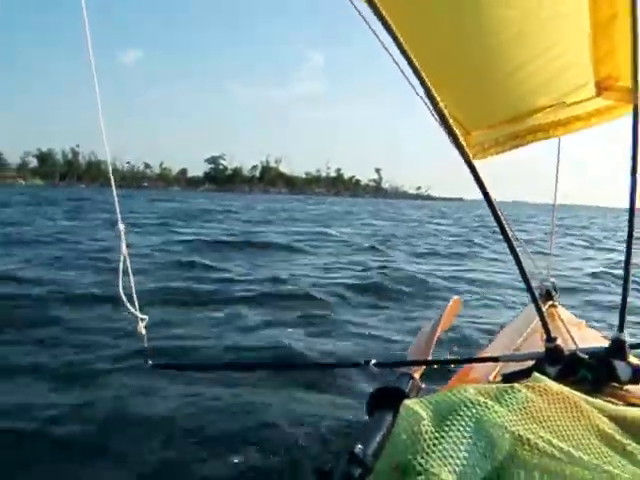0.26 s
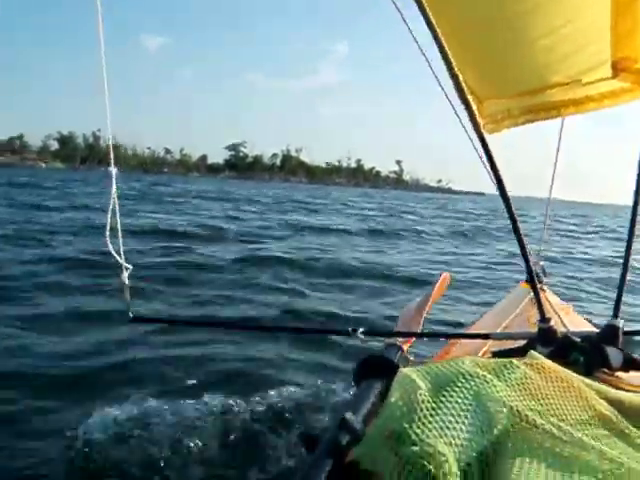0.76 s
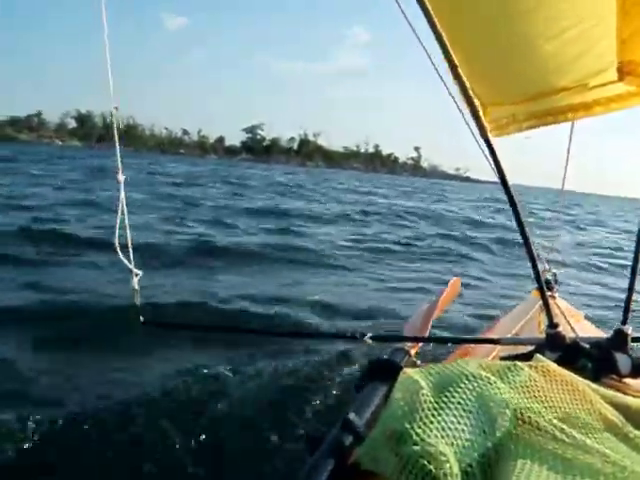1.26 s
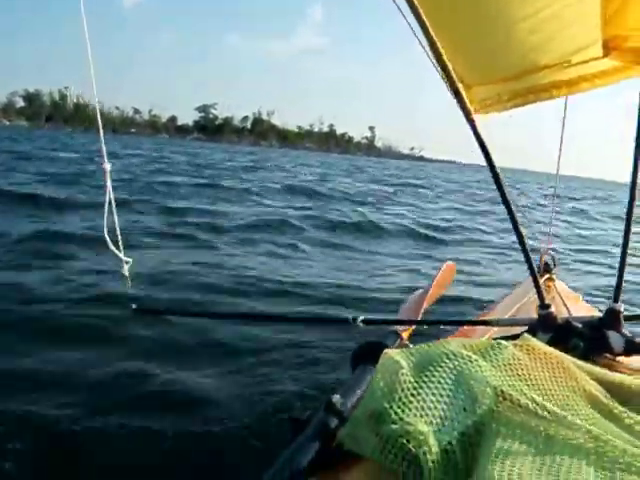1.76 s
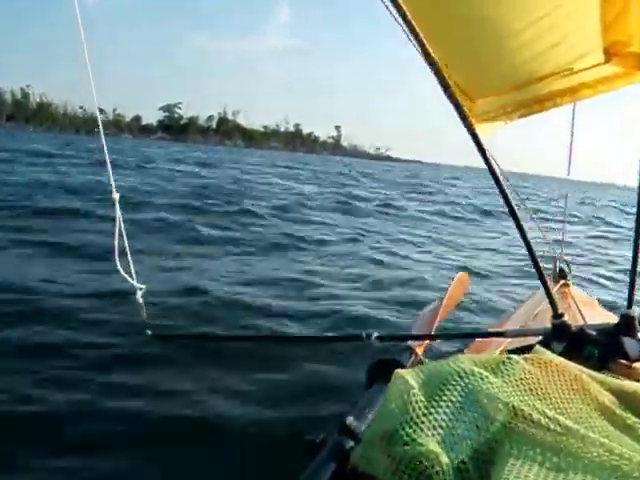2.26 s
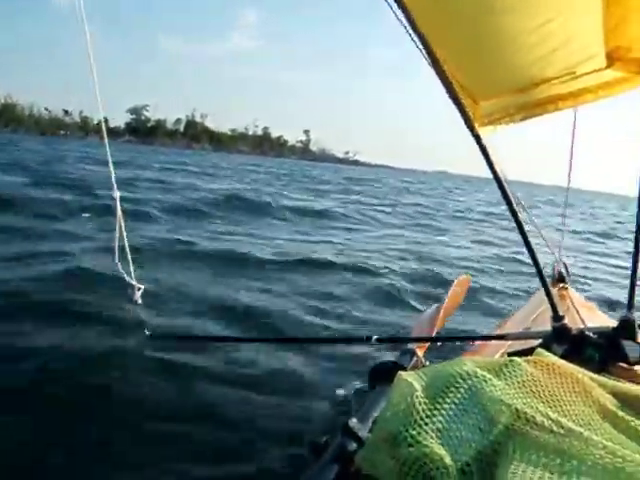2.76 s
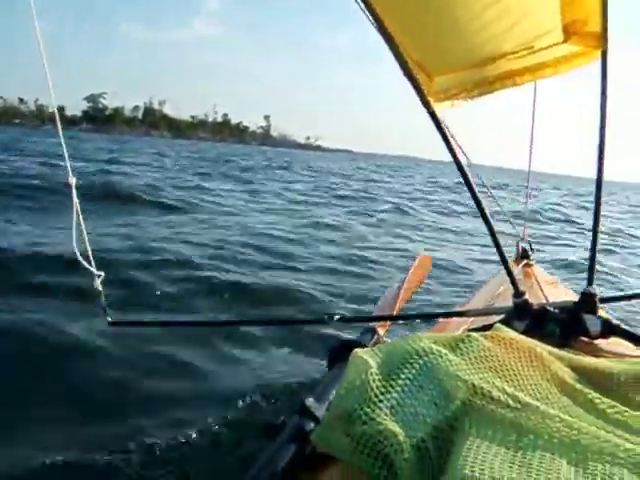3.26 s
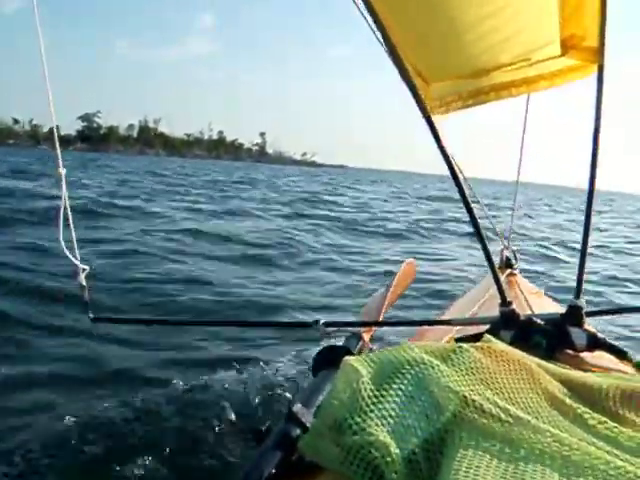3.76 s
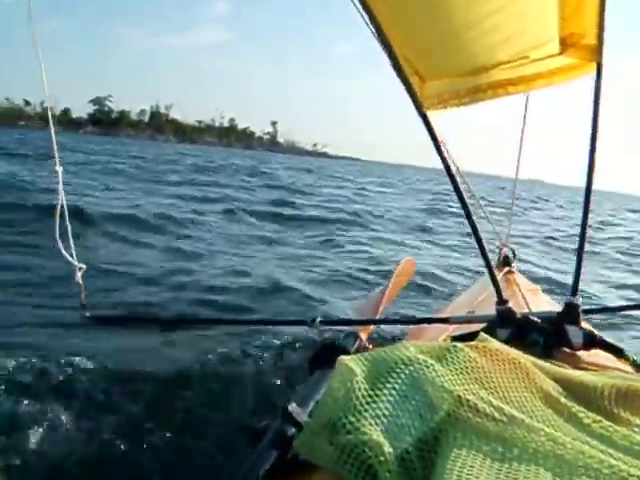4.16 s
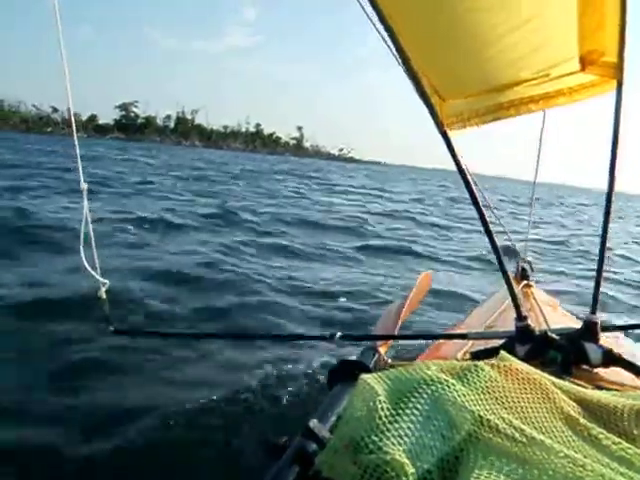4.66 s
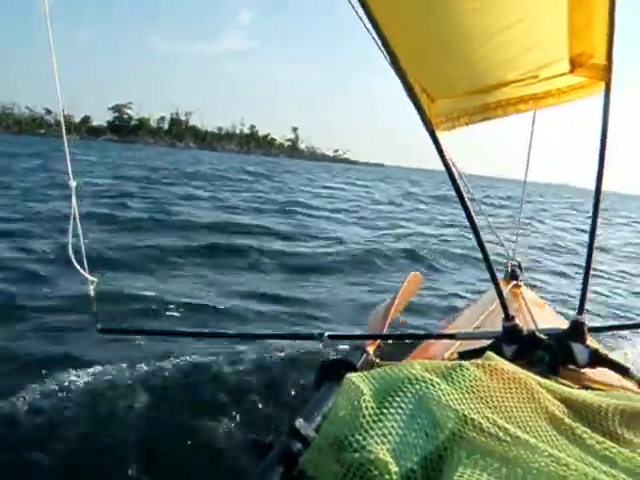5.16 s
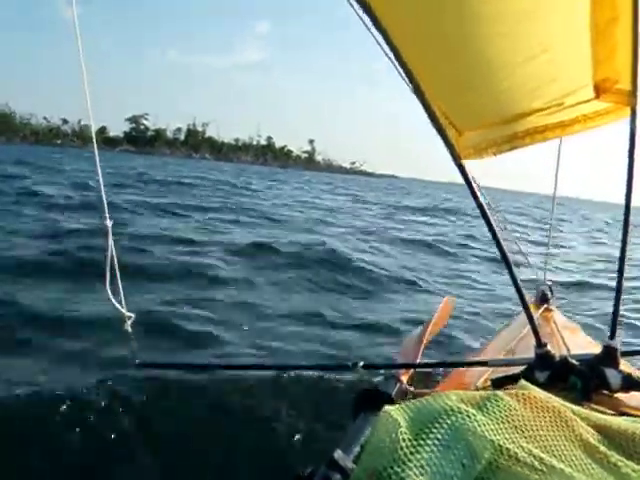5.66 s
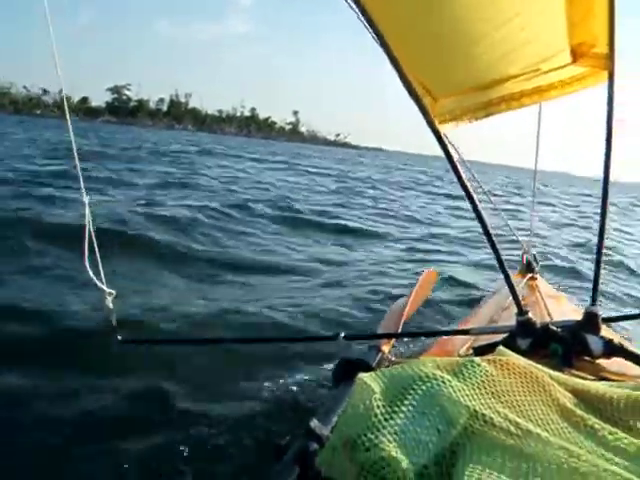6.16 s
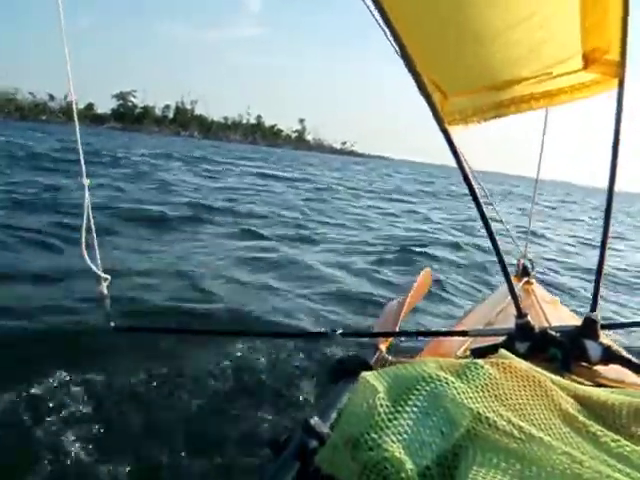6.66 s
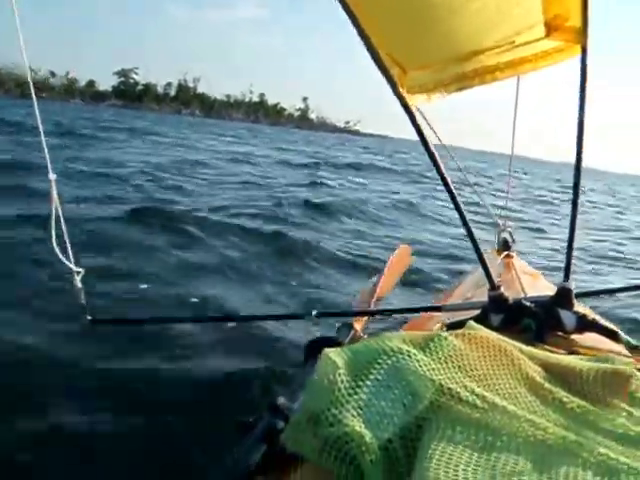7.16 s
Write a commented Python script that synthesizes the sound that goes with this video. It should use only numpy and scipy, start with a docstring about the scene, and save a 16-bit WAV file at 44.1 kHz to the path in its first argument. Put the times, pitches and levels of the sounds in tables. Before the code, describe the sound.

Choppy water churns and swells along a small boat's hull, with hollow slaps, bubbling gurgles, ticking drops and low wind thumps on the microphone.

```python
"""Bow waves of a small sailing kayak in chop, heard from a camera on board.
Each wave swells into churning bubbles and spray: patchy coloured noise plus swarms of decaying sines.
Wavelets slap the hull, air pockets gurgle upward in pitch, drops tick and ping, flung spray patters.
Wind is flickering low noise; buffets are short runs of low-pitched pressure pulses.
The camera adds two faint steady tones and a low-pass."""
import sys
import numpy as np
from scipy import signal
from scipy.fft import rfft, irfft, next_fast_len
from scipy.io import wavfile
from scipy.ndimage import uniform_filter1d

SR = 44100
rng = np.random.default_rng(int(sys.argv[2]) if len(sys.argv) > 2 else 0)


def int16_out(signal):
    """Quantize to a 16-bit WAV file."""
    q = np.round(np.clip(np.atleast_2d(signal).T, -1, 1) * 32767)
    wavfile.write(sys.argv[1], SR, q.astype(np.int16))


N = 325898
T = np.arange(N) / SR

# Levels in the tables are nominal, before each source's trim gains.
# waves breaking at the bow: crest_s, rise_s, fall_s, churn_db, spray_db
BOW_WAVES = [(0.1, 0.18, 0.1, -41, -54), (0.8, 0.3, 0.29, -32, -44.5), (1.3, 0.086, 0.085, -33.5, -43.5),
             (1.63, 0.15, .17, -44, -50.5), (2.97, .22, 0.26, -39, -56), (3.9, 0.34, 0.22, -32.5, -45),
             (4.55, 0.22, 0.34, -42, -52), (5.02, 0.11, .17, -33.5, -46), (5.37, .12, 0.25, -39.5, -52),
             (6.4, 0.21, 0.34, -32.5, -45.3), (7.38, 0.14, .15, -36.5, -49)]
# spectrum of churning water: freq_hz, density_db (relative)
CHURN_SPECTRUM = [(140, -16.5), (290, 4.5), (440, 4), (610, 5), (960, 3.5), (1240, -1.5), (1680, -2.5),
                  (2150, -16.5), (2850, -42), (5100, -58.5)]
# spectrum of spray: freq_hz, density_db (relative)
SPRAY_SPECTRUM = [(1250, 0), (2050, 2.5), (2550, 0.5), (3150, 1), (3850, -1.5), (4850, -1.5), (6050, -3.5),
                  (7050, -6.5), (8050, -11.5), (8900, -38)]
# wind level at the microphone: time_s, level_db
WIND_LEVEL = [(0.0, -37), (0.12, -45), (0.33, -43), (0.54, -34), (0.88, -43.5), (1.25, -34), (1.56, -43),
              (2.3, -40), (2.59, -36.5), (4.16, -47), (4.4, -39.5), (4.69, -42), (4.88, -38.5), (5.06, -42),
              (5.84, -35), (6.2, -42.5), (6.75, -37.5), (7.39, -39)]
# spectrum of wind turbulence: freq_hz, density_db (relative)
WIND_SPECTRUM = [(21, -33.5), (36, -12.5), (52, -7.5), (76, -1), (112, 1.5), (158, 1), (235, -1), (325, -8),
                 (510, -19), (1020, -35), (2900, -77)]
# strong eddies hitting the microphone: centre_s, level_db, pitch_hz, length_s
STRONG_BUFFETS = [(0.022, -13.5, 175, 0.0028), (0.057, -11, 173, 0.0046), (0.435, -20, 204, 0.0042),
                  (0.463, -20.5, 292, 0.0093), (0.597, -20, 204, 0.011), (1.254, -24, 270.6, .018),
                  (1.424, -20.5, 168, 0.014), (1.948, -23, 220, .012), (2.218, -19.5, 240, .018),
                  (2.489, -16, 179, 0.011), (2.509, -15, 196, 0.0077), (2.55, -21.5, 221, 0.01),
                  (2.636, -21.5, 208, 0.0067), (3.267, -18.5, 294, .017), (3.328, -23, 217, .01),
                  (3.365, -11.5, 217, 0.0072), (4.241, -11.5, 154, 0.0034), (4.328, -17, 180, 0.0085),
                  (4.452, -12.5, 304, 0.0065), (4.67, -19.5, 166, 0.0082), (4.738, -17.5, 218, 0.0197),
                  (5.279, -23.5, 313, 0.0078), (5.658, -17, 191, 0.0059), (5.791, -16.5, 182, 0.0096),
                  (6.04, -17.5, 204, 0.0062), (6.064, -16.5, 196, 0.0082), (6.159, -20, 230, .007),
                  (6.456, -14, 262, 0.0074), (6.596, -20, 220, 0.0072), (6.666, -17.5, 233, 0.0072),
                  (6.731, -14, 250, 0.0068), (6.76, -21.5, 258, 0.0094), (6.865, -11.5, 225, 0.0071)]
# air pockets squeezed along the hull: start_s, length_s, level_db, first_pitch_hz, last_pitch_hz
AIR_POCKETS = [(0.059, 0.019, -35.5, 593, 1200), (.24, 0.092, -42.5, 393.6, 1083),
               (0.747, 0.021, -36, 1080, 1900), (1.025, 0.036, -33, 718, 1046),
               (1.256, 0.05, -34.5, 470, 655), (1.597, 0.042, -40.5, 467, 714),
               (2.617, .03, -46.5, 1984, 2350), (5.425, .027, -47, 1710, 2080),
               (6.076, 0.06, -39, 880, 1770), (6.155, 0.027, -37, 1584, 2180)]
# large drops landing close by: centre_s, level_db, pitch_hz
LARGE_DROPS = [(1.186, -29.5, 4100), (1.308, -25, 3500), (4.668, -31.5, 4500), (5.269, -28.5, 3700),
               (5.355, -26, 4840), (6.08, -33, 4300), (6.471, -28.5, 4030), (6.702, -34, 5150),
               (7.093, -32.5, 5200)]
# strong wavelets on the hull: start_s, level_db, bubble_pitch_hz, decay_s, ring_power_share (0-1)
STRONG_SLAPS = [(0.51, -21, 646, 0.01, 0.86), (1.034, -27, 883, 0.012, .85), (1.281, -24, 892, 0.013, 0.93),
                (1.594, -28.5, 940, 0.023, 0.65), (1.859, -25, 955, 0.0097, 0.73),
                (1.932, -32.5, 621, 0.032, 0.43), (2.41, -30.5, 1180, 0.011, 0.46),
                (2.811, -29.5, 550, 0.018, 0.98), (3.985, -20, 608, 0.011, 0.98),
                (4.317, -30, 950, 0.017, 1), (4.823, -30, 960, 0.012, 0.92),
                (4.984, -24.5, 870, 0.02, 0.27), (5.361, -27.5, 1065, .026, 0.56),
                (5.992, -24, 472, 0.009, 1), (6.078, -29, 600, 0.022, 0.9), (6.247, -31.5, 1040, .01, .3),
                (6.505, -24, 1410, .013, 0.64), (7.059, -24.5, 887, 0.0063, 0.3)]
# handfuls of spray falling back: start_s, length_s, level_db
SPRAY_FALLS = [(0.533, .07, -43.5), (1.263, 0.081, -42.5), (1.6, 0.075, -46.5), (1.838, 0.044, -49),
               (4.656, 0.026, -52.5), (5.348, 0.05, -42), (6.603, 0.027, -42), (7.053, 0.07, -54)]
# steady camera tones: freq_hz, level_db (rms)
CAMERA_TONES = [(7886, -79), (8114, -83)]

CALM_CHURN_DB, CALM_SPRAY_DB = -47, -53  # wash between waves
SURGE_SHAPE = 1.49  # exponent: 1 pointed crest, 2 rounded
DROP_S = .0021  # nominal drop length
EDGE_HZ = 8800  # camera low-pass


def amp(db):
    """Decibels to gain."""
    return 10 ** (np.asarray(db) / 20)


def unit(x):
    """Scale to rms 1."""
    return x / np.sqrt(np.mean(np.abs(x) ** 2) + 1e-20)


def curve(rows, axis):
    """One table column interpolated to every sample."""
    rows = np.asarray(rows)
    return np.interp(T, rows[:, 0], rows[:, axis])


def colour(points, hz):
    """Spectrum gain at the given frequencies."""
    f, db = np.transpose(points)
    return amp(np.interp(np.log(hz + 1), np.log(f), db))


def add(mix, s, sound):
    """Mix in a sound starting at s seconds."""
    start = round(s * SR)
    sound = sound[max(-start, 0):]
    part = mix[max(start, 0):][:len(sound)]
    part += sound[:len(part)]


def patchy_noise(points, patch_db, patch_s, patch_hz, flicker_db):
    """Coloured noise with time-frequency patches and a flicker shared by all pitches."""
    window, hop = 512, 128
    frames, hz = N // hop + 9, np.fft.rfftfreq(window, 1 / SR)
    re, im, patches = rng.standard_normal((3, len(hz), frames))
    span_frames = max(1, round(patch_s * SR / hop))
    width_bins = max(1, round(patch_hz / hz[1]))
    patches = uniform_filter1d(patches, span_frames, axis=1)
    patches = unit(uniform_filter1d(patches, width_bins, axis=0))
    flicker = unit(uniform_filter1d(rng.standard_normal(frames), span_frames))
    gain = amp(patch_db * np.clip(patches, -2, 2) + flicker_db * np.clip(flicker, -2, 2))
    x = signal.istft((re + 1j * im) * gain, nperseg=window, noverlap=window - hop)[1][:N]
    size = next_fast_len(N)
    spectrum = rfft(x, size) * colour(points, np.fft.rfftfreq(size, 1 / SR))
    return unit(irfft(spectrum, size)[:N])


def bubble(t, hz, decay_s, rise):
    """A trapped air pocket rings and dies; its pitch climbs as it nears the surface."""
    age = np.maximum(t, 0) / decay_s
    pitch_hz = hz * (1 + rise * (np.minimum(age, 3) - .5))
    phase = 2 * np.pi * np.cumsum(pitch_hz * (t > 0)) / SR
    return (1 - np.exp(-6 * age)) * np.exp(-age) * np.sin(phase)


def bubbles(points, low_hz, high_hz, per_s, cycles, spread_db, rise, count=70):
    """A swarm of bubbles of many sizes, most of them faint."""
    out = np.zeros(N)
    for hz in np.geomspace(low_hz, high_hz, count):
        decay_s = cycles * rng.uniform(0.52, 1.29) / hz
        t = np.arange(int(5 * decay_s * SR) + 8) / SR
        ring = unit(bubble(t, hz, decay_s, rise)) / np.sqrt(decay_s)
        gain = colour(points, hz) * np.sqrt(hz)
        draws = rng.random((600, 3))[:max(1, int(per_s * N / SR / count))]
        for when, luck, side in draws:
            size_db = spread_db * min(-np.log(1 - luck), 3.5)
            polarity = np.sign(side - .5)
            add(out, when * N / SR, ring * amp(size_db) * gain * polarity)
    return unit(out)


def burst(t, hz, decay_s, octaves):
    """One band of noise with a quick rise, then a decay."""
    f = np.fft.rfftfreq(len(t), 1 / SR)
    band = 1 / (1 + np.abs(np.log2(np.maximum(f, 1) / hz) / octaves) ** 5)
    noise = irfft(band * np.exp(2j * np.pi * rng.random(len(f))), len(t))
    shape = (1 - np.exp(-22 * t / decay_s)) * np.exp(-t / decay_s)
    return unit(noise * shape) * np.sqrt(np.mean(shape ** 2) / 2)


def surge(axis, calm_db):
    """Level in dB of one bow-wave part: each wave swells to its crest and ebbs into the calm wash."""
    power = amp(calm_db) ** 2
    for wave in BOW_WAVES:
        crest_s, rise_s, fall_s = wave[:3]
        away = np.abs(T - crest_s) / np.where(T < crest_s, rise_s, fall_s)
        power = power + amp(wave[axis]) ** 2 * np.exp(-away ** SURGE_SHAPE)
    return 10 * np.log10(power)


def scatter(level_db, per_s, spread_db, low_hz, high_hz):
    """Small events, loosely even in time, following a driving level: time_s, level_db, pitch_hz."""
    when, size, pitch = rng.random((300, 3)).T
    s = (np.arange(len(when)) + when) / per_s
    db = np.interp(s, T, level_db) + spread_db * (2 * size - 1)
    hz = low_hz * (high_hz / low_hz) ** pitch
    return np.transpose([s, db, hz])[s < T[-1]]


def low_cut(x, hz):
    """The microphone port passes little of the deepest pressure swings."""
    return signal.sosfilt(signal.butter(2, hz, "highpass", fs=SR, output="sos"), x)


def bow_wave():
    """Water churns into large bubbles and throws up fine spray."""
    wash = amp(-3.5) * patchy_noise(CHURN_SPECTRUM, patch_db=4.0, patch_s=.016, patch_hz=340,
                                    flicker_db=1.5)
    bubbling = amp(-4.0) * bubbles(CHURN_SPECTRUM, low_hz=358.5, high_hz=2523, per_s=400,
                                   cycles=7.74, spread_db=3.0, rise=.09)
    spray = amp(0.5) * patchy_noise(SPRAY_SPECTRUM, patch_db=1.27, patch_s=.014, patch_hz=700,
                                    flicker_db=0.7)
    fizz = amp(-3) * bubbles(SPRAY_SPECTRUM, low_hz=1844, high_hz=7170, per_s=900,
                             cycles=5.7, spread_db=6.0, rise=0.055)
    churn_db = surge(axis=3, calm_db=CALM_CHURN_DB)
    spray_db = surge(axis=4, calm_db=CALM_SPRAY_DB)
    crackle = amp(0.28 * (spray_db - spray_db.mean()))  # crests crackle more than calm water
    return (wash + bubbling) * amp(churn_db) + (spray + crackle * fizz) * amp(spray_db)


def wind():
    """Lumpy low turbulence at the microphone."""
    turbulence = patchy_noise(WIND_SPECTRUM, patch_db=2.5, patch_s=.018, patch_hz=180, flicker_db=3.0)
    return amp(3.5) * amp(curve(WIND_LEVEL, axis=1)) * turbulence


def buffets(trim_db=1.5, sharpness=3.6, spacing_cycles=1.228, reach=1.0,
            edge_db=-12, edge_hz=470, over_wind_db=13, light_s=0.00914):
    """Runs of eddies, each a pulse of a cycle or two, with a noisy leading edge; light ones follow the wind."""
    out, t = np.zeros(N), np.arange(-4096, 4096) / SR
    place = np.arange(-5, 6)[:, None]  # eddy index within a run
    light = scatter(curve(WIND_LEVEL, axis=1) + over_wind_db, per_s=6.5, spread_db=5,
                    low_hz=165, high_hz=280.4)
    for centre_s, db, hz, length_s in list(STRONG_BUFFETS) + [(*row, light_s) for row in light]:
        jitter, turn, size = rng.random((3, len(place), 1))
        offset = 0.71 * (jitter - .5) * (place != 0)
        at_s = (place + offset) * spacing_cycles / hz
        pitch_hz = hz * (0.86 + 0.34 * size)
        pulse = (1 - 2j * np.pi * pitch_hz * (t - at_s) / sharpness) ** -sharpness
        eddies = (pulse * np.exp(2j * np.pi * turn)).real
        run = (eddies * np.exp(-np.abs(at_s) / (reach * length_s))).sum(0)
        run = unit(run) * np.sqrt(length_s * SR / len(t) / 2)
        add(out, centre_s + t[0], amp(db + trim_db) * run)
        edge = burst(t - t[0], edge_hz, 1.5 * length_s, octaves=0.55)
        add(out, centre_s - length_s / 2, amp(db + edge_db) * edge)
    return low_cut(out, hz=108)


def gurgles(flutter=0.45, flutter_s=0.0055):
    """A shrinking air pocket sweeps upward while the water shakes it."""
    out = np.zeros(N)
    for s, length_s, db, first_hz, last_hz in AIR_POCKETS:
        pitch_hz = np.geomspace(first_hz, last_hz, round(length_s * SR))
        shake = uniform_filter1d(rng.standard_normal((2, SR)), max(1, round(flutter_s * SR)))
        re, im = unit(shake)[:, :len(pitch_hz)]
        carrier = np.exp(2j * np.pi * np.cumsum(pitch_hz) / SR)
        ring = ((1 + flutter * (re + 1j * im)) * carrier).real
        add(out, s, amp(db) * unit(ring * signal.windows.tukey(len(ring), .6)))
    return out


def drops(ping_db=3.0, tick_db=1, over_spray_db=9):
    """A drop lands with a tick and a tiny bubble's ping; small ones fall out of the spray throughout."""
    out, t = np.zeros(N), np.arange(2048) / SR
    spray_db = surge(axis=4, calm_db=CALM_SPRAY_DB)
    small = scatter(spray_db + over_spray_db, per_s=7, spread_db=5, low_hz=2100, high_hz=5790)
    for centre_s, db, hz in list(LARGE_DROPS) + list(small):
        ping = amp(ping_db) * bubble(t, hz, .5 * DROP_S, rise=0.028)
        tick = amp(tick_db) * burst(t, hz, 1.1 * DROP_S, octaves=0.42)
        add(out, centre_s - DROP_S / 2, amp(db) * (ping + tick))
    return out


def slaps(ring_db=3.0, splash_db=3.0, rise=0.091, splash_hz=1050, splash_octaves=0.86,
          lap_db=-37, lap_follow=0.52, lap_s=0.01, lap_ring=0.61):
    """Wavelets smack the hull with a splash and a ringing air pocket; light laps follow the churn level."""
    out, t = np.zeros(N), np.arange(8192) / SR
    swell_db = surge(axis=3, calm_db=CALM_CHURN_DB) - CALM_CHURN_DB
    laps = scatter(lap_db + lap_follow * swell_db, per_s=4.5, spread_db=5, low_hz=562, high_hz=1392)
    for s, db, hz, decay_s, share in list(STRONG_SLAPS) + [(*lap, lap_s, lap_ring) for lap in laps]:
        share = np.clip(share, 0, 1)
        pocket = amp(ring_db) * bubble(t, hz, decay_s, rise)
        splash = amp(splash_db) * burst(t, splash_hz, decay_s, splash_octaves)
        add(out, s, amp(db) * (np.sqrt(share) * pocket + np.sqrt(1 - share) * splash))
    return out


def showers(patter_db=-2.5, mist_db=-4.5):
    """Flung spray lands as a short cluster of small drops in a fine mist."""
    patter = amp(patter_db) * bubbles(SPRAY_SPECTRUM, low_hz=1530, high_hz=4870, per_s=1300,
                                      cycles=3.6, spread_db=5.5, rise=0.037)
    mist = amp(mist_db) * patchy_noise(SPRAY_SPECTRUM, patch_db=3.5, patch_s=.009, patch_hz=904,
                                       flicker_db=-2.5)
    fall = np.zeros(N)
    for s, length_s, db in SPRAY_FALLS:
        age = np.linspace(0, 1, round(length_s * SR))
        add(fall, s, amp(db) * unit(np.sin(np.pi * age ** 0.83)))
    return fall * (patter + mist)


def scene():
    """Water and wind summed at one microphone."""
    water = bow_wave() + gurgles() + drops() + slaps() + showers()
    return (water + wind() + buffets())[None]


def record(dry):
    """The camera adds its faint whine and limits the band."""
    whine = sum(amp(db) * np.sqrt(2) * np.sin(2 * np.pi * hz * T) for hz, db in CAMERA_TONES)
    low_pass = signal.firwin(301, EDGE_HZ, window=("kaiser", 8), fs=SR)
    return signal.oaconvolve(dry + whine, low_pass[None], "same")


dry = scene()
out = record(dry)
int16_out(out)
```